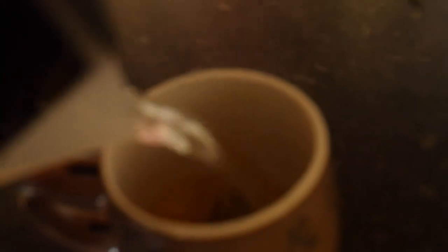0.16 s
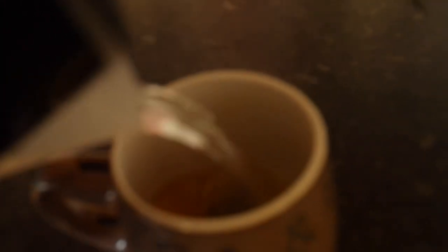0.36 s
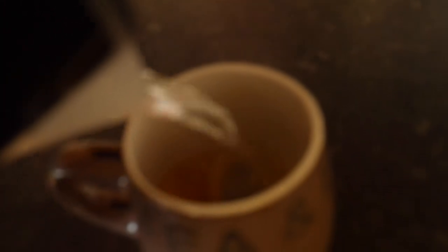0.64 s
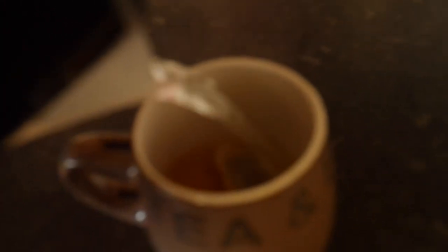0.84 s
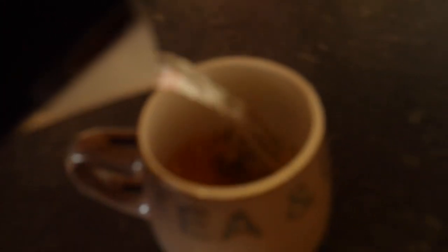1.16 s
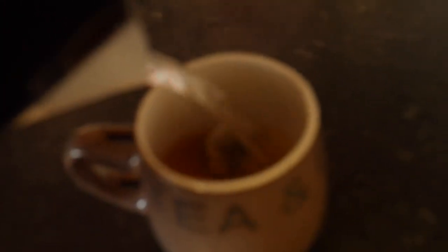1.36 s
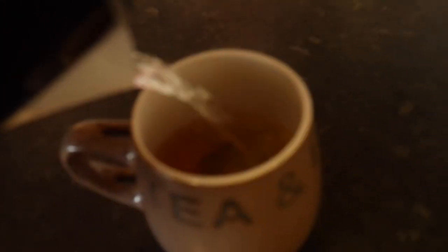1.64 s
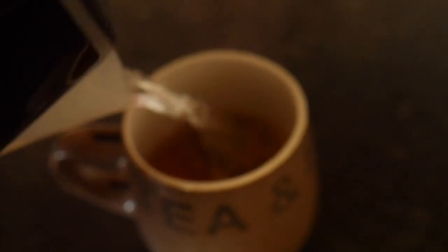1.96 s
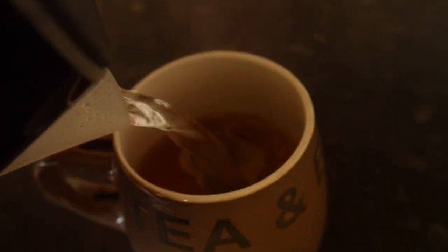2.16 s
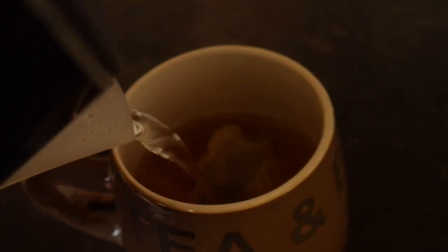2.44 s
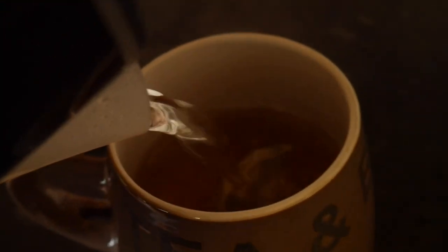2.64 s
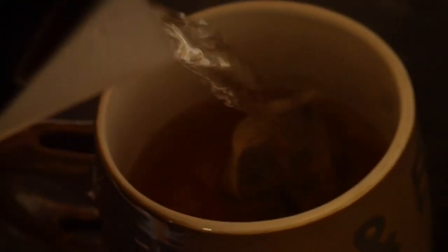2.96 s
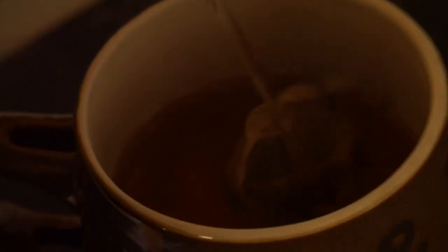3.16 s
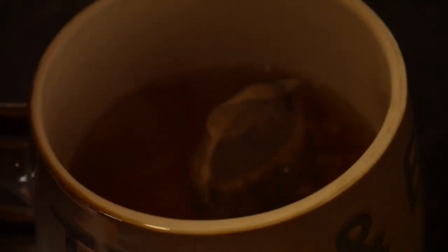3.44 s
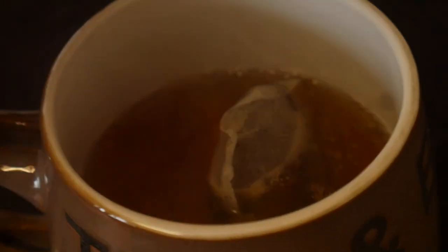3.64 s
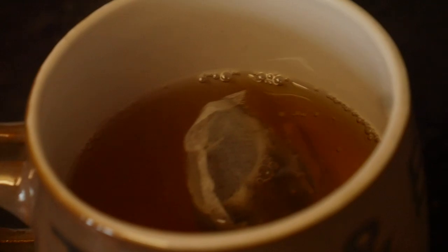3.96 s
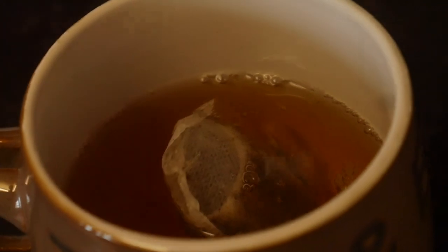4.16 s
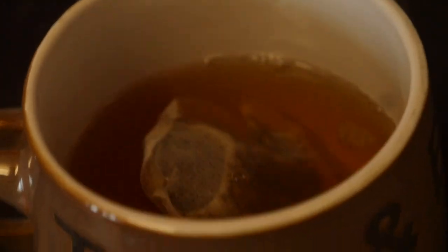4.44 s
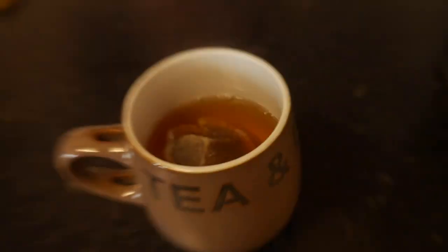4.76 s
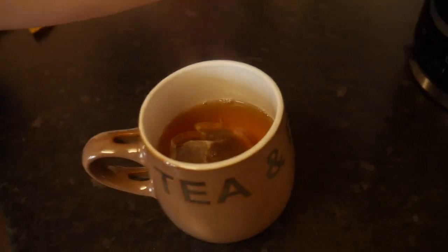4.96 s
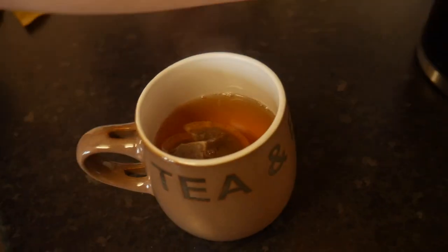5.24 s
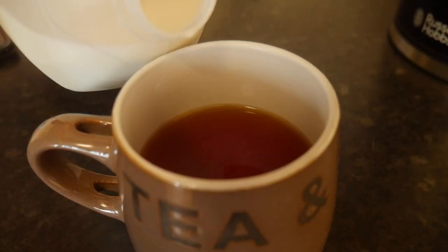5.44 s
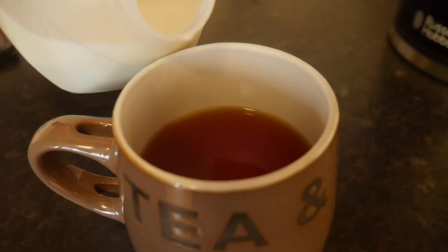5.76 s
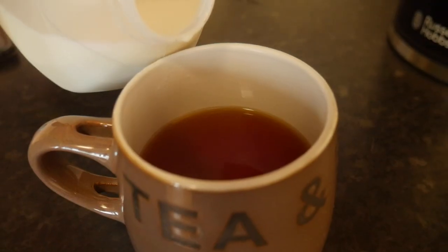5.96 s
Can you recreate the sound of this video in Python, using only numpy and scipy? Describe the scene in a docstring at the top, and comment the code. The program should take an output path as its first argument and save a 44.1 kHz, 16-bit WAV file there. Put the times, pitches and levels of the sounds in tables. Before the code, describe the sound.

Hot water splashes into a mug and thins to drips, then a kettle slides and knocks onto its base in a small kitchen.

```python
"""Hot water gurgles and splashes from a kettle into a mug, ringing the air inside, whose pitch climbs
as the mug fills. The pour thins to drips. The kettle is lifted away, slides with a creak of its shell
over a rumbling worktop, and is knocked down onto its base; the walls of a small kitchen answer.
Air puffs at the microphones and mains hum lies underneath. After the last knock the sound drops
briefly to silence, then the quiet kitchen returns."""
import sys
import numpy as np
from scipy import signal
from scipy.fft import rfft, irfft, next_fast_len
from scipy.io import wavfile
from scipy.ndimage import map_coordinates

SR = 44100
rng = np.random.default_rng(int(sys.argv[2]) if len(sys.argv) > 2 else 0)


def wav_record(signal):
    """Record a signal, one row per channel, as 16-bit PCM in the file named by sys.argv[1]."""
    frames = np.transpose(np.atleast_2d(signal))
    bounded = np.clip(frames, -1, 1)
    # unit amplitude maps onto the largest positive 16-bit level
    quanta = np.round(bounded * 32767).astype(np.int16)
    wavfile.write(sys.argv[1], SR, quanta)


N = 269054

# level rides of the stream: time_s, gurgle_db, spray_db
POUR_LEVELS = [(0, -49, -61.5), (.46, -45.5, -65.5), (1.9, -48.5, -65.5), (2.25, -58.5, -69),
               (2.93, -64, -71), (3.0, -52.5, -75.5), (3.14, -51.5, -83.5), (3.25, -57, -67)]
# splashes in the mug: start_s, level_db, pitch_hz, slap_db (relative to the level)
SPLASHES = [(0.097, -27, 950, -14.5), (0.163, -24, 946, -11.5), (0.236, -25, 980, -9),
            (0.259, -21.5, 986, -13.5), (0.289, -28.5, 980, -33), (0.337, -29.5, 1000, -13),
            (0.382, -23, 984, -14), (0.399, -15.5, 1055, -20.5), (0.444, -25, 1030, -32),
            (0.542, -21.5, 960, -17), (0.589, -25.5, 1060, -15.5), (0.61, -23, 960, -28.5),
            (0.678, -23.5, 1030, -4.5), (0.757, -18.5, 1090, -8.5), (0.903, -19.5, 1066, -20),
            (0.962, -24, 1040, -16), (0.986, -25.5, 1030, -13), (1.152, -14.5, 1085, -23),
            (1.183, -20.5, 1060, -12.5), (1.259, -27.5, 1110, -26), (1.293, -21, 1125, -10.5),
            (1.368, -22.5, 1060, -8.5), (1.457, -26.5, 1065, -10), (1.527, -21.5, 1226, -19.5),
            (1.728, -24.5, 1290, -29.5), (1.821, -27, 1130, -6.5), (1.856, -22.5, 1335, -16),
            (1.886, -25, 1140, -2.5), (1.981, -28, 1440, -6), (2.01, -26.5, 1250, -15),
            (2.055, -30, 1184, -15), (2.113, -32, 1220, -9), (2.311, -41, 1210, 0.5),
            (2.443, -32.5, 1260, -16), (2.75, -39.5, 1330, -9.5), (3.064, -29, 1310, -16.5),
            (3.122, -36, 1200, -15), (3.131, -34.5, 1220, -3.5), (3.173, -23.5, 1360, -20),
            (3.181, -28, 1080, -9.5), (3.199, -33, 1240, -23), (3.211, -32, 1410, -1),
            (3.225, -25, 1410, -19)]
# big bubbles swallowed by the stream: start_s, level_db
GULP_BUBBLES = [(.098, -32), (.163, -28), (.236, -30), (0.399, -28), (.542, -23.5), (.677, -28.5),
                (.757, -29), (0.904, -30.5), (1.367, -33), (1.458, -28.5)]
# stray droplets that tick: start_s, level_db
DROPLETS = [(0.1315, -25.5), (0.2903, -29.5), (0.3255, -34), (0.734, -38), (0.8822, -34), (0.8995, -27.5),
            (0.9972, -29.5), (1.126, -29), (1.2397, -33), (1.3543, -28), (1.4661, -27), (1.49, -35),
            (1.7516, -34.5), (2.078, -38), (2.5304, -38), (3.236, -32)]
# kettle hits: start_s, level_db, thud_db, hardness_db (high ring against low), thud_hz, clack_hz
KETTLE_HITS = [(4.18, -34, -45, -10.5, 202, 1140), (4.203, -32, -53, -15.5, 200, 1140),
               (4.288, -8.5, -23, -28.5, 146, 1137), (4.3, -19, -29, -9.5, 140, 1050),
               (4.453, -12, -15, -11.5, 222, 1140), (4.457, -13.5, -30, -2.5, 227, 1440),
               (4.523, -18, -28.5, -3.5, 209, 1450), (4.571, -26, -45, -13, 200, 1440),
               (4.836, -30.5, -38, -2.5, 170, 1590), (4.907, -24.5, -29, -15, 250, 1220),
               (4.921, -8.5, -25, -6.5, 260, 1320), (4.97, -27, -26.5, -9.5, 165, 1300),
               (5.033, -21, -28.5, -10.5, 252, 1250), (5.055, -15.5, -24, -5, 260, 1300),
               (5.072, -8.5, -13, -3.5, 165.6, 1320), (5.123, -26.5, -21, -29, 150, 1370),
               (5.292, -28.5, -34, -13, 198.7, 1108)]
# low mode of kettle and base: pitch_hz, gain_db, t60_s
LOW_MODES = [(800, -3.5, .075)]
# high modes of kettle and base: pitch_hz, gain_db, t60_s
HIGH_MODES = [(2070, 0, .025), (2560, 0, .025), (3200, -4, .02)]
# level ride of the sliding kettle: time_s, level_db
SCRAPE_LEVELS = [(2.95, -66), (3.19, -48), (3.26, -51), (3.44, -47), (3.52, -39.5), (3.58, -46),
                 (3.95, -55), (4.25, -54), (4.8, -45), (5.02, -40.5), (5.06, -24.5), (5.11, -39.5),
                 (5.27, -39), (5.3, -39)]
# resonances of the scraped shell: pitch_hz, width_hz, gain_db
SHELL_MODES = [(1420, 110, 4), (1860, 130, -3), (2500, 150, 1), (3100, 140, -5), (3580, 180, -8)]
# broad colour of the drag: frequency_hz, gain_db
DRAG_EQ = [(200, -35.5), (350, -1.5), (690, -6), (770, 6.5), (880, -4), (2500, -11), (4500, -20),
           (6500, -29), (15000, -48)]
# the kettle's weight shifts and the worktop booms: peak_s, level_db
WEIGHT_SHIFTS = [(3.185, -43), (3.5, -38.5), (3.63, -40.5), (3.8, -47.5), (4.88, -37), (4.96, -33.5),
                 (5.085, -26)]
# colour of the worktop's rumble: frequency_hz, gain_db
WORKTOP_EQ = [(41, -38.5), (70, -19), (100, -3.5), (135, 5), (170, -9), (300, -9), (600, -16.5),
              (780, -56.5)]
# reverb time of the kitchen: frequency_hz, t60_s
WALL_DECAY = [(150, 0.62), (1000, 0.85), (4000, 0.92), (12000, 0.21)]
# level ride of the buffeting air: time_s, level_db
BUFFET_LEVELS = [(4.52, -85), (4.68, -32), (4.78, -49.5), (5.1, -50), (5.3, -65)]
# colour of the buffeting air: frequency_hz, gain_db
BUFFET_EQ = [(15, 2.5), (100, -18.5), (400, -33.5), (1200, -59.5)]
# level rides of the room tone: time_s, hum_db, air_db
ROOM_LEVELS = [(0, -43.5, -48.5), (5.3, -41.5, -51), (5.6, -45.5, -51.5)]
# colour of kitchen air and hiss: frequency_hz, gain_db
AIR_EQ = [(25, -9), (75, -16), (125, -14), (240, -18.5), (400, -20), (1200, -24.5), (2100, -33.5),
          (4200, -48), (14500, -60)]
# stereo width: frequency_hz, side_db (relative to mid)
WIDTH_EQ = [(40, -44.5), (180, -38), (550, -33.5), (1650, -50), (5000, -24.5), (15000, -13)]
# colour of the microphones' own noise: frequency_hz, gain_db
SELF_NOISE_EQ = [(25, -4), (1000, -32), (15000, -33.5)]

AIR_DEPTH_M, FILL_M_PER_S, FULL_S = 0.0881, 0.0095, 2.2  # the air column shortens until FULL_S
POUR_END_S, POUR_FADE_S = 3.3, 0.033
TRICKLE_S, TRICKLE_DB = 2.2, -14  # from here drips fall softly, with less spray and fainter bubbles
SWELL_DB_PER_S, DIE_DB_PER_S = 449, 132  # attack and release of a worktop boom
MUTE_FROM_S, MUTE_TO_S = 5.316, 5.634
TOP_HZ = 16550
TIME_S = np.arange(N) / SR


def stream():
    """Bubbles pop near the pitch of the mug's air, churning drives its modes, fine droplets crackle."""
    air_hz = air_pitch()
    gurgle_db, spray_db = curves(POUR_LEVELS)
    flowing = np.clip((POUR_END_S - TIME_S) / POUR_FADE_S, 0, 1)
    churn = spatter(260, 0.75, 0.0029) + .5 * rng.standard_normal(N)
    depth_mode = unit(band(gliding(churn, air_hz, 170), 735, 1600))
    cross_mode = unit(band(gliding(churn, cross_pitch(air_hz), 280), 2500, 6800))
    popping = bubbles(air_hz, scatter=.05, cycles=16, spread_db=2.2, count=240)
    popping *= amp(TRICKLE_DB * (TIME_S > TRICKLE_S))
    gurgle = amp(-2.5) * (popping + depth_mode) + amp(-11.5) * cross_mode
    crackle = unit(band(spatter(60, 4.5, .003) + .5 * rng.standard_normal(N), 3500, 15500))
    wash = unit(band(churn, 1700, 6400))
    fizz = bubbles(np.full(N, 7000), scatter=.6, cycles=8, spread_db=3.7, count=520)
    spray = fizz + amp(0.5) * crackle + amp(-3) * wash
    gurgle *= amp(gurgle_db + 3.9 * wobble(12.65))
    spray *= amp(spray_db + 1.4 * wobble(24.8))
    return flowing * (gurgle + spray)


def splashes():
    """Splashes ring the mug's air, slap its cross mode and throw spray; bubbles gulp, droplets tick."""
    tone, slaps, spray = np.zeros((3, N))
    t = np.arange(SR // 16) / SR
    air_hz = air_pitch()
    for s, db, hz, slap_db in SPLASHES:
        _, slap_noise, spray_noise = rng.standard_normal((3, len(t)))
        slap_noise[1] = spray_noise[1] = 4  # the impact itself is one click
        is_drip = s > TRICKLE_S
        t60_s, attack_s = (0.014, 0.0001) if is_drip else (0.021, 0.00047)
        add(tone, s, amp(db + 2) * ring(hz, t, t60_s, attack_s))
        tap = (1 - t / .00018) * np.exp(-t / 0.00016)
        add(tone, s, is_drip * amp(db - 10) * tap)
        cross_hz = cross_pitch(air_hz[round(s * SR)])
        add(tone, s, amp(db + slap_db - 4.5) * ring(cross_hz, t, 0.038, 0.00032))
        add(slaps, s, amp(db + slap_db + 4.5) * decay(t, 0.036) * slap_noise)
        patter = (decay(t, 0.016) + 0.045 * decay(t, 0.07)) * spray_noise
        add(spray, s, amp(db + slap_db - 6 + TRICKLE_DB * is_drip) * patter)
    for s, db in GULP_BUBBLES:
        gulp_hz = 512 * amp(rng.normal(0, 0.74))
        add(tone, s, amp(db) * ring(gulp_hz, t, 0.032, 0.0012, rise=0.1))
    for s, db in DROPLETS:
        add(tone, s, amp(db - 1) * ring(air_hz[round(s * SR)], t, 0.023, 0.0004))
        low_hz = rng.uniform(2500, 6500)  # each tick has its own colour
        tick = amp(db + 2) * decay(t, 0.0088) * rng.standard_normal(len(t))
        add(spray, s, band(tick, low_hz, 2.16 * low_hz))
    return tone + band(slaps, 1280, 4200) + band(spray, 2500, 13700)


def bubbles(centre_hz, scatter, cycles, spread_db, count):
    """Tiny bubbles ping at random moments of the pour, pitched around the curve centre_hz; rms 1."""
    starts, size = (rng.random((count, 2)) * [POUR_END_S * SR, 1]).T
    starts, age = starts.astype(int)[:, None], np.arange(SR // 40)
    hz = np.minimum(centre_hz[starts] * np.exp(scatter * rng.standard_normal((count, 1))), TOP_HZ)
    gains = amp(-spread_db * np.log(1 - size))[:, None]
    pings = gains * ring(hz, age / SR, cycles / hz, 1 / hz, rise=0.029)
    return unit(np.bincount((starts + age).ravel(), pings.ravel(), N))


def air_pitch():
    """The quarter-wave pitch of the air above the climbing water, in Hz."""
    return 343 / (4 * (AIR_DEPTH_M - FILL_M_PER_S * np.minimum(TIME_S, FULL_S)))


def cross_pitch(air_hz):
    """The mode across the mug climbs with the depth mode, by a smaller musical interval."""
    return 2900 + 1.14 * np.maximum(air_hz - 1080, 0) ** 1.1


def kettle_knocks():
    """Each hit rings the short modes of kettle and base in a burst of clatter, which the walls answer."""
    out, t = np.zeros(N), np.arange(SR // 8) / SR
    click = 7 * (t == 0)  # the first touch

    def body(modes):
        return sum(amp(db + rng.normal(0, 2)) * ring(hz * amp(rng.normal(0, .12)), t, t60_s, .0005)
                   for hz, db, t60_s in modes)

    def clatter(lo_hz, hi_hz, t60_s):
        burst = (rng.standard_normal(len(t)) + click) * decay(t, t60_s)
        return unit(band(band(burst, lo_hz, hi_hz), lo_hz, hi_hz))

    for s, db, thud_db, hardness_db, thud_hz, clack_hz in KETTLE_HITS:
        thud = amp(thud_db - db) * (ring(thud_hz, t, 0.076, 0.0016) + 0.25 * clatter(125, 294, 0.06))
        dull = amp(-16.5) * clatter(620, 1550, 0.08)
        sharp = amp(hardness_db - 15) * clatter(1700, 3650, 0.078)
        snap = amp(-36.5 + 0.75 * hardness_db) * clatter(3300, 10500, 0.06)
        clack = ring(clack_hz, t, 0.033, 0.00071)
        rings = body(LOW_MODES) + clack + amp(hardness_db + 8.5) * body(HIGH_MODES)
        add(out, s, amp(db) * (thud + rings + dull + sharp + snap))
        reverb_send = .5 * thud + .1 * rings + dull + sharp + snap
        add(out, s + .006, amp(db - 10.5) * wall_reverb(reverb_send))
    return band(out, 120, 18000)


def kettle_slide():
    """A first light slide sings in the kettle's shell; later drags are broad. The worktop rumbles."""
    scrape_db, = curves([(2.8, -100)] + SCRAPE_LEVELS + [(5.4, -100)])
    booms = sum(amp(db - np.maximum(SWELL_DB_PER_S * (s - TIME_S), DIE_DB_PER_S * (TIME_S - s)))
                for s, db in WEIGHT_SHIFTS)
    grit = spatter(400, 1.9, 0.0015) + 0.63 * rng.standard_normal(N)
    shell = unit(filtered(grit * amp(1.1 * wobble(32)), shell_response))
    drag = unit(eq(grit, DRAG_EQ))
    drag_mix = np.clip((TIME_S - 3.52) / 0.081, .25, 1)
    rasp = amp(-30.5 + 1.3 * (scrape_db + 36)) * unit(band(grit, 3000, 13000))  # hard drags turn bright
    scrape = (1 - drag_mix) * shell + drag_mix * drag + rasp
    rumble = (amp(scrape_db - 4) + booms) * amp(2.5 * wobble(20)) * noise(WORKTOP_EQ)
    return amp(scrape_db) * scrape + rumble


def shell_response(hz):
    """The shell's resonances in parallel, alternating in polarity."""
    return sum((-1) ** k * amp(db) * 1j * hz * width / (pitch ** 2 - hz ** 2 + 1j * hz * width)
               for k, (pitch, width, db) in enumerate(SHELL_MODES))


def wall_reverb(x):
    """The kitchen's answer: a noise tail in which each frequency dies at its own speed."""
    hz, t, spectrum = signal.stft(rng.standard_normal(SR // 2), SR, nperseg=256)
    tail = signal.istft(spectrum * decay(t, along(WALL_DECAY, hz)[:, None]), SR, nperseg=256)[1]
    return signal.fftconvolve(x, tail / np.linalg.norm(tail))


def air_buffet():
    """Lumpy low wind hits the left and right microphones independently."""
    level_db, = curves([(0, -120)] + BUFFET_LEVELS)
    return np.array([amp(level_db + 4 * wobble(32)) * noise(BUFFET_EQ) for _ in "LR"])


def room_tone():
    """A 50 Hz mains hum over the kitchen's still air."""
    hum_db, air_db = curves(ROOM_LEVELS)
    hum = np.sqrt(2) * amp(hum_db + 0.88 * wobble(12)) * np.sin(2 * np.pi * 50 * TIME_S)
    return hum + amp(air_db + 0.39 * wobble(0.79)) * noise(AIR_EQ)


def ring(hz, t, t60_s, attack_s, rise=0):
    """A dying tone with a soft start; its pitch climbs by the share 2 * rise over t60_s."""
    return np.sin(2 * np.pi * hz * t * (1 + rise * t / t60_s)) * decay(t, t60_s) * (1 - np.exp(-t / attack_s))


def spatter(per_s, spread_db, length_s):
    """Random short noise bursts of unequal size, rms 1."""
    starts = (rng.random(N) < per_s / SR) * amp(spread_db * rng.exponential(size=N))
    envelope = signal.lfilter([1], [1, -np.exp(-1 / (length_s * SR))], starts)
    return unit(envelope * rng.standard_normal(N))


def gliding(x, hz, width_hz):
    """x through a resonance that follows the curve hz, rms 1."""
    carrier = np.exp(2j * np.pi * np.cumsum(hz) / SR)
    pole = np.exp(-np.pi * width_hz / SR)
    return unit(np.real(carrier * signal.lfilter([1], [1, -pole], x / carrier)))


def wobble(per_s):
    """A smooth random curve through per_s points a second."""
    return map_coordinates(rng.standard_normal(int(N * per_s / SR) + 4), [TIME_S * per_s])


def noise(colour):
    return unit(eq(rng.standard_normal(N), colour))


def eq(x, colour):
    return filtered(x, lambda hz: amp(along(colour, hz)))


def filtered(x, response):
    """x through a complex frequency response."""
    size = next_fast_len(N + SR // 2)
    return irfft(rfft(x, size) * response(np.fft.rfftfreq(size, 1 / SR)), size)[..., :N]


def band(x, lo_hz, hi_hz):
    return signal.sosfilt(signal.butter(2, [lo_hz, hi_hz], "band", fs=SR, output="sos"), x)


def along(points, hz):
    """Reads (frequency_hz, value) points on a log frequency axis."""
    points_hz, values = np.transpose(points)
    return np.interp(np.log(hz + 1), np.log(points_hz + 1), values)


def curves(rows):
    """One value per sample for each column after the time."""
    times, *columns = np.transpose(rows)
    return [np.interp(TIME_S, times, column) for column in columns]


def add(out, start_s, x):
    part = out[round(start_s * SR):][:len(x)]
    part += x[:len(part)]


def decay(t, t60_s):
    return amp(-60 * t / t60_s)


def amp(db):
    return 10 ** (np.asarray(db) / 20)


def unit(x):
    return x / np.sqrt(np.mean(x ** 2) + 1e-20)


def scene():
    """Water, kettle and room sit in the centre; two close microphones differ most in the treble."""
    mid = stream() + splashes() + kettle_slide() + kettle_knocks() + room_tone()
    diffuser = rng.standard_normal(SR // 100)
    side = eq(signal.fftconvolve(mid, diffuser / np.linalg.norm(diffuser))[:N], WIDTH_EQ)
    side += amp(-74.5) * noise(SELF_NOISE_EQ)
    return np.array([mid + side, mid - side]) + air_buffet()


def record(dry):
    """Master chain: a brief mute, a soft clip at full scale and a steep high cut."""
    fade_out, fade_in = (MUTE_FROM_S - TIME_S) / 0.014, (TIME_S - MUTE_TO_S) / 0.0086
    gated = dry * np.clip(np.maximum(fade_out, fade_in), 0, 1)
    clipped = gated / (1 + np.abs(gated) ** 8) ** (1 / 8)
    return filtered(clipped, lambda hz: np.clip((TOP_HZ - hz) / 700, 0, 1) ** 2)


dry = scene()
out = record(dry)
wav_record(out)
```